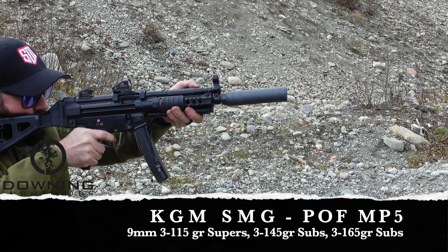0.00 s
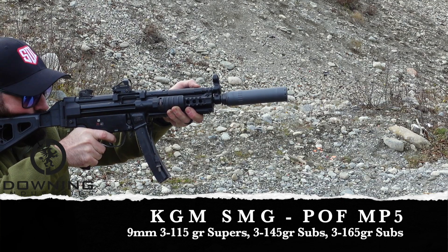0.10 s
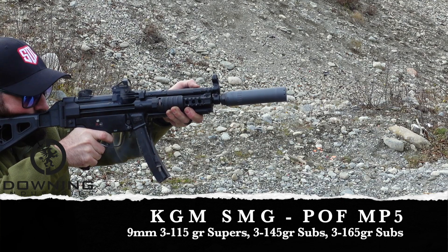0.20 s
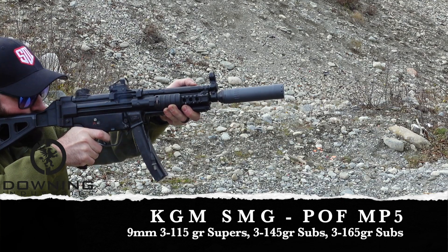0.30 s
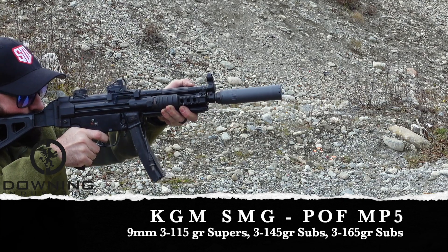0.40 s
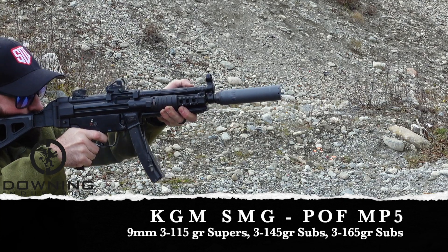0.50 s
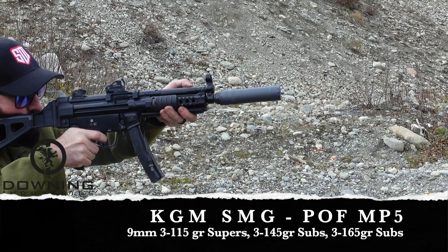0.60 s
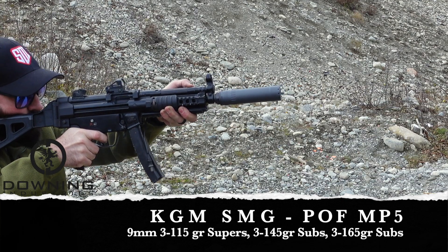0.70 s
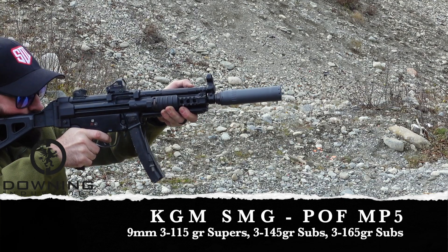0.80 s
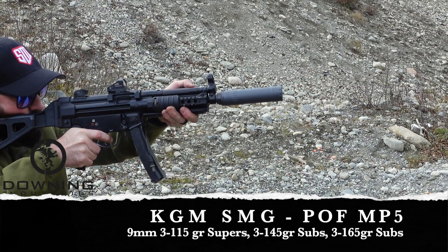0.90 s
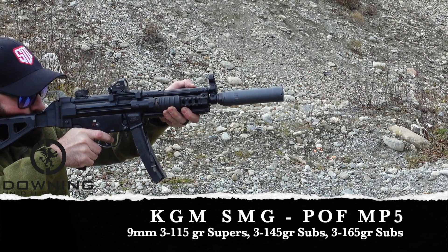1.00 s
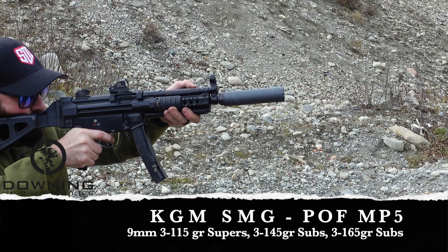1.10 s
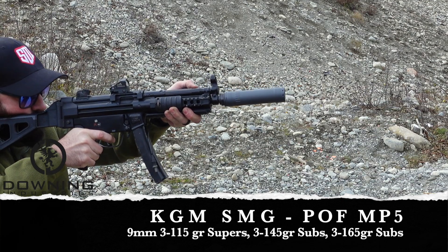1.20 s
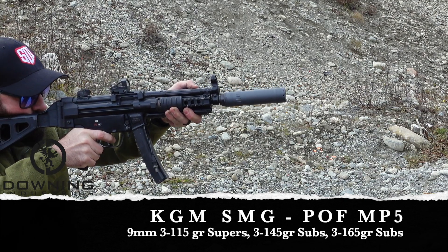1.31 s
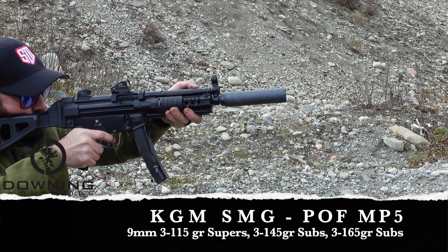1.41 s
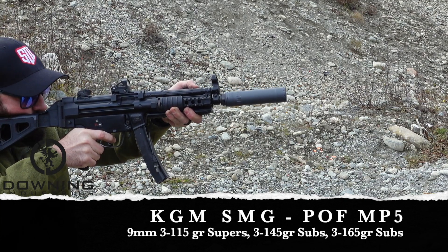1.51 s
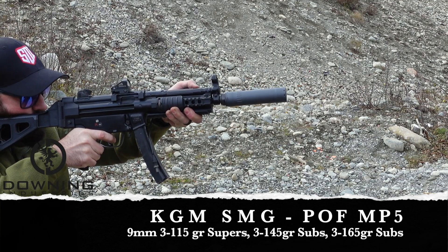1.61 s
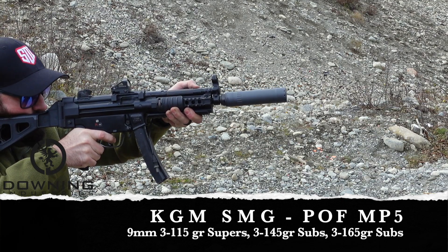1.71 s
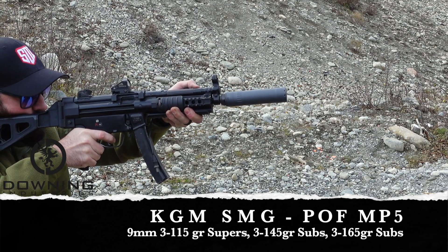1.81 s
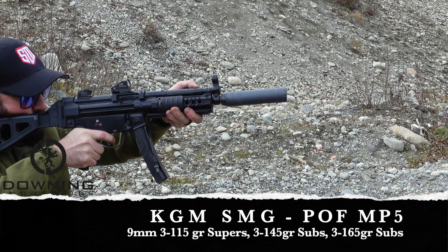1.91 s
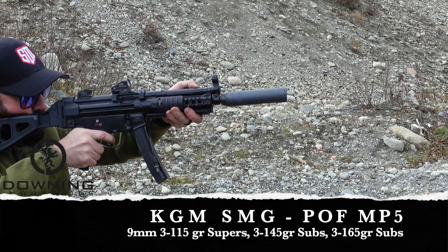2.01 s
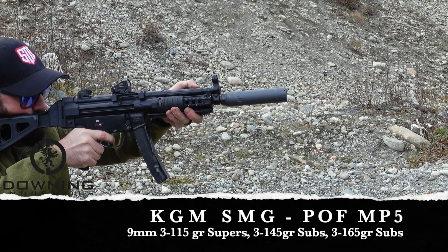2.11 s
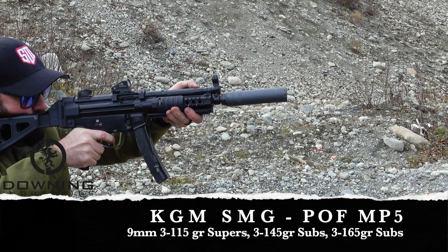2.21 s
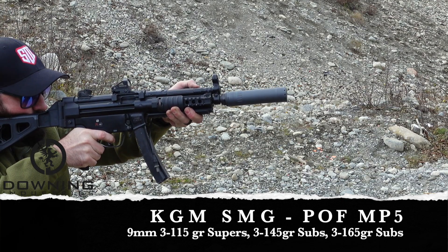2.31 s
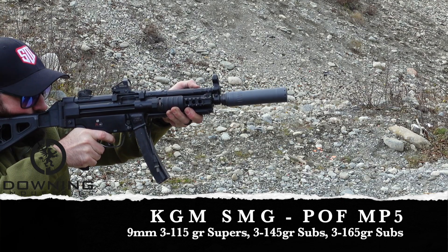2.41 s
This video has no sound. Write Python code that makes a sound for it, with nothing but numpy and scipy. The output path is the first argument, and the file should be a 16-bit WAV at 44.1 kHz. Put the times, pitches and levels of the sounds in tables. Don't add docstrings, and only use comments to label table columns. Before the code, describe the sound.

A suppressed submachine gun fires once, close to an overloading microphone: a hard puff of gas, steel bolt clacking back and home, bright gravel echo fading, then a small trigger reset click in quiet open air.

```python
import sys
import numpy as np
from scipy import signal
from scipy.fft import rfft, irfft
from scipy.io import wavfile

SR = 44100
rng = np.random.default_rng(int(sys.argv[2]) if len(sys.argv) > 2 else 0)


def master_out(mix):
    frames = np.transpose(np.atleast_2d(mix))
    ceiling = np.clip(frames, -1, 1)
    pcm = np.round(ceiling * 32767).astype(np.int16)
    wavfile.write(sys.argv[1], SR, pcm)


def ratio(d):
    e = np.asarray(d, float) / 20
    return 10 ** e


N = 110250
T = np.arange(N) / SR

# frequency in Hz, density in dB per Hz.
AIR_TONE = [(24, -28.5), (40, 3), (54, -11.5), (80, -5.5), (302, -6), (1130, -11.5), (1450, -12.5),
            (2850, -26), (15500, -35.5)]
AIR_DB = -63.5
# time in seconds, level in dB.
GUSTS_S_DB = [(0.0, -65), (0.12, -77.5), (0.28, -68), (0.4, -63), (0.78, -74), (0.99, -73), (1.71, -62),
              (1.93, -74), (2.5, -68.5)]
WIND_HZ, WIND_DB = 35, 3
# frequency in Hz, level in dB.
WHINE_HZ_DB = [(11461, -103), (13878, -96)]
# start in seconds, frequency in Hz, level in dB, t60 in seconds.
LOOSE_TICK = [
    (2.455, 3750, -64, .04),
    (2.462, 3500, -68, .03),
]

# start in seconds, level in dB, hold in seconds, t60 in seconds.
SHIFTS = [
    (1.409, -62.5, 0.0071, 0.083),
    (1.705, -63, 0.01, .06),
]
# frequency in Hz, density in dB per Hz.
SHIFT_TONE = [(300, -10.5), (600, -11), (1000, -2), (2000, -10), (5000, -31)]

# return time in seconds, level in dB.
ECHO_S_DB = [(0.242, -20.5), (0.308, -22.5), (.34, -20.5), (.38, -19.5), (.43, -20.5), (0.471, -25.5),
             (.52, -23), (0.618, -26), (.84, -31), (1.02, -40.5), (1.3, -47), (1.8, -51), (2.5, -49.5)]
# frequency in Hz, density in dB per Hz.
ECHO_TONE = [(59, -50), (100, -19), (281, -5), (565, -4.5), (1060, -1.5), (1400, 2), (4020, -5.5),
             (10600, -14.5), (15500, -24)]
# frequency in Hz, loss in dB per second.
PATH_LOSS = [(150, -82), (250, -79.5), (450, -17.5), (800, -15), (1500, -13.5), (3700, -24), (6000, -36.5),
             (10000, -91.5), (16000, -130)]
LOSS_START_S, LOSS_EASES_S = .37, 2.68

# start in seconds, level in dB, hold in seconds, t60 in seconds.
GRAVEL = [
    (.3262, -10, .001, .012),
    (.3300, -20.5, .004, .03),
    (.3640, -22, .006, 0.15),
    (.3760, -18, .002, .03),
]
# frequency in Hz, density in dB per Hz.
GRAVEL_TONE = [(180, -34.5), (300, -6.5), (1910, -4), (2400, -3), (3750, 1), (6060, -7), (10400, -15.5),
               (15500, -26)]
# start in seconds, level in dB, hold in seconds, t60 in seconds.
BANK = [
    (.3980, -21.5, 0.0035, .03),
    (.4075, -14, .001, .03),
    (.4118, -16.5, .001, 0.012),
    (.4170, -17, .006, 0.03),
]
# frequency in Hz, density in dB per Hz.
BANK_TONE = [(47, -50), (80, -26), (263, -19.5), (437, 1.5), (1290, -8), (2090, -7.5), (2910, -21),
             (4230, -11), (15500, -42)]
# start in seconds, frequency in Hz, level in dB, t60 in seconds.
KNOCKS = [
    (.4070, 440, -16.5, 0.15),
    (.4085, 4500, -14, .03),
    (.4120, 140, -36, 0.16),
]

# frequency in Hz, level in dB, t60 in seconds.
RECEIVER_MODES = [(1200, -12, .01), (2470, -7, 0.024), (3530, -4, 0.0092), (4460, -4, .008),
                  (5830, -2.5, .01), (6470, 2.5, .006), (7770, -8, 0.018), (8820, -1.5, .008),
                  (13500, -3, .008)]
# start in seconds, level in dB, hold in seconds, t60 in seconds.
HAMMER = [
    (.2100, -64, .005, .03),
    (.2273, -6, .0004, .006),
    (.2281, -19, .0025, .008),
    (.2305, -29, .004, .03),
]
# start in seconds, level in dB, hold in seconds, t60 in seconds.
BOLT = [
    (.2440, -20.5, .040, .03),
    (.2614, -7, .0003, 0.009),
    (.2872, -16, .002, .02),
    (.2888, -8, .0008, 0.011),
    (.2908, -16, .004, 0.013),
    (.2945, -9.5, .0004, .008),
    (.2968, -4, .0018, .012),
    (.3020, -17, .003, .01),
]
# start in seconds, level in dB, hold in seconds, t60 in seconds.
RESET = [
    (.8390, -41, .002, .03),
    (.8432, -15, .0006, 0.0059),
    (.8440, -13.5, 0.00056, .012),
    (.8483, -21, .003, 0.01),
    (.8530, -33.5, .003, 0.04),
]
# frequency in Hz, density in dB per Hz.
HAMMER_TONE = [(180, -61.5), (300, -34), (1240, -5), (3080, 2), (5670, -6.5), (6160, -9), (13200, -9),
               (15500, -13.5)]
# frequency in Hz, density in dB per Hz.
SLIDE_TONE = [(59, -48.5), (100, -12.5), (743, 2.5), (1770, 1), (2930, -3.5), (4020, -11), (8780, -9.5),
              (15500, -21.5)]
# frequency in Hz, density in dB per Hz.
BOLT_TONE = [(120, -51.5), (200, -21.5), (770, -7.5), (4580, 1), (5210, -9), (6360, -2), (12500, -7.5),
             (13700, -7.5), (15500, -17)]
# frequency in Hz, density in dB per Hz.
RESET_TONE = [(150, -40), (450, -22), (700, -0.5), (1500, -2.5), (1900, -7.5), (3200, -0.5), (4300, 6),
              (5400, -3), (15500, -15.5)]

# start in seconds, level in dB, hold in seconds, t60 in seconds.
BLAST = [
    (.2360, 8, .003, 0.025),
]
# frequency in Hz, density in dB per Hz.
BLAST_TONE = [(180, -29.5), (300, -0.5), (1220, -1), (2700, -7.5), (3510, -5.5), (4580, -12), (5960, -3),
              (15500, -21)]
PUSH_S, PUSH_HZ, PUSH_DB, PUSH_HOLD_S, PUSH_T60_S = .2364, 112, -3, .007, .03

# start in seconds, depth in dB, recovery in seconds.
DUCKS = [
    (0.2368, -10, 0.028),
    (.3000, -7, 0.39),
    (.8450, -3.5, .5),
]
DUCK_ATTACK_S, CLIP_TOP = .004, 0.88


def at_hz(points, hz):
    p = np.array(points)
    return np.interp(np.log(np.maximum(hz, 1)), np.log(p[:, 0]), p[:, 1])


def rms_one(x):
    return x / np.sqrt(np.mean(x ** 2) + 1e-20)


def colour(x, tone):
    hz = np.fft.rfftfreq(4096, 1 / SR)
    rolloff_db = 12 * np.log2(np.maximum(tone[0][0] / (hz + 1), 1))
    cepstrum = irfft(np.log(ratio(at_hz(tone, hz) - rolloff_db)))
    cepstrum[1:2048] *= 2
    cepstrum[2049:] = 0
    taps = irfft(np.exp(rfft(cepstrum)))[:2048]
    return signal.fftconvolve(x, taps / np.sqrt(np.sum(taps ** 2)))[:N]


def drift(rate_hz):
    r = np.exp(-2 * np.pi * rate_hz / SR)
    noise = rng.standard_normal(N + SR)
    return rms_one(signal.lfilter([1], [1, -2 * r, r * r], noise)[SR:])


def envelope(rows):
    total = 0
    for start_s, db, hold_s, t60_s in rows:
        attack = np.clip((T - start_s) / .0003, 0, 1)
        decay_db = 60 * np.maximum(T - start_s - hold_s, 0) / t60_s
        total = total + ratio(db - decay_db) * attack
    return total


def grit(spread_db):
    noise = rng.standard_normal(N)
    click_db = spread_db * np.minimum(rng.exponential(1, N), 4)
    return rms_one(noise * ratio(click_db))


def tones(rows):
    total = 0
    for start_s, hz, db, t60_s in rows:
        total = total + envelope([(start_s, db, 0, t60_s)]) * np.sin(2 * np.pi * hz * (start_s - T))
    return total


def background():
    air = ratio(AIR_DB + .7 * drift(3)) * colour(rng.standard_normal(N), AIR_TONE)
    gust_db = np.interp(T, *np.transpose(GUSTS_S_DB))
    wind = ratio(gust_db + WIND_DB + 5.5 * drift(8)) * drift(WIND_HZ)
    whine = sum(ratio(db + 5.5) * np.sin(2 * np.pi * hz * T) for hz, db in WHINE_HZ_DB)
    return air + wind + tones(LOOSE_TICK) + whine


def shifts():
    return colour(envelope(SHIFTS) * rng.standard_normal(N), SHIFT_TONE)


def echo():
    edges_hz = 90 * 2 ** np.arange(0, 7.6, 1 / 3)
    white = rng.standard_normal((2, N))
    late_s = LOSS_EASES_S * (1 - np.exp(-np.maximum(T - LOSS_START_S, 0) / LOSS_EASES_S))
    shared_drift = drift(14)
    out = 0
    for k, (low, high) in enumerate(zip(edges_hz, edges_hz[1:])):
        sos = signal.butter(3, [low, high], "band", fs=SR, output="sos")
        band = signal.sosfilt(sos, white[k % 2])
        hz = np.sqrt(low * high)
        band_db = at_hz(ECHO_TONE, hz) + at_hz(PATH_LOSS, hz) * late_s
        out = out + band * ratio(band_db + .8 * shared_drift + 1.2 * drift(25))
    s, db = np.transpose(ECHO_S_DB)
    return ratio(np.interp(T, s, db) + 9.5) * (T > s[0]) * out


def gravel():
    return colour(envelope(GRAVEL) * grit(spread_db=4.0), GRAVEL_TONE)


def bank():
    thud = colour(envelope(BANK) * grit(spread_db=-1.0), BANK_TONE)
    return thud + tones(KNOCKS)


def steel(rows, tone, ring_db):
    hits = envelope(rows) * grit(spread_db=0.5)
    rings = 0
    for k, (hz, db, t60_s) in enumerate(RECEIVER_MODES):
        r = ratio(-60 / (t60_s * SR))
        w = 2 * np.pi * hz / SR
        gain = np.sqrt(1 - r * r) * np.sin(w)
        mode = signal.lfilter([gain], [1, -2 * r * np.cos(w), r * r], hits + 1e-18)
        rings = rings + (-1) ** k * ratio(db) * mode
    return colour(hits + ratio(ring_db) * rings, tone)


def action():
    hammer = steel(HAMMER, HAMMER_TONE, ring_db=-14.5)
    slide = steel(BOLT[:2], SLIDE_TONE, ring_db=-10)
    slam = steel(BOLT[2:], BOLT_TONE, ring_db=-12.5)
    reset = steel(RESET, RESET_TONE, ring_db=-19)
    return hammer + slide + slam + reset


def blast():
    jet = colour(envelope(BLAST) * rng.standard_normal(N), BLAST_TONE)
    swell = envelope([(PUSH_S, PUSH_DB, PUSH_HOLD_S, PUSH_T60_S)])
    return jet + swell * np.sin(2 * np.pi * PUSH_HZ * (T - PUSH_S))


def scene():
    mix = action() + bank() + gravel() + shifts() + blast() + echo() + background()
    return mix[None]


def band_limit(x):
    return signal.sosfilt(signal.butter(12, 15680, fs=SR, output="sos"), x)


def record(dry):
    duck_db = 0
    for start_s, db, recovery_s in DUCKS:
        since_s = np.maximum(T - start_s, 0)
        duck_db = duck_db + db * (1 - np.exp(-since_s / DUCK_ATTACK_S)) * np.exp(-since_s / recovery_s)
    return band_limit(np.clip(dry, -CLIP_TOP, CLIP_TOP) * ratio(duck_db))


dry = scene()
out = record(dry)
master_out(out)
```